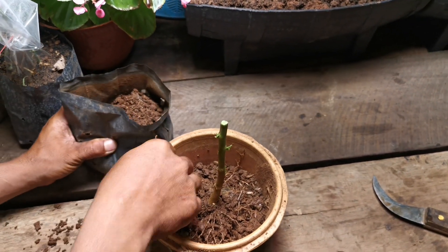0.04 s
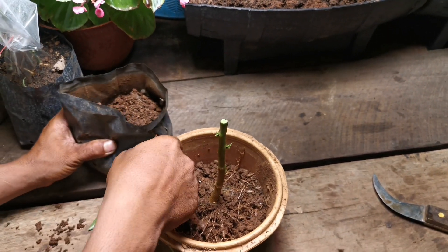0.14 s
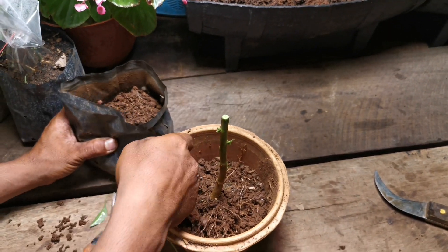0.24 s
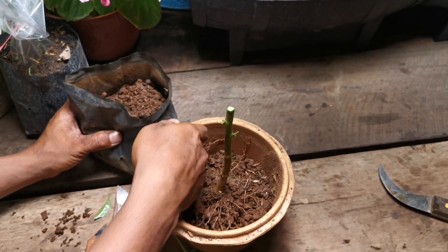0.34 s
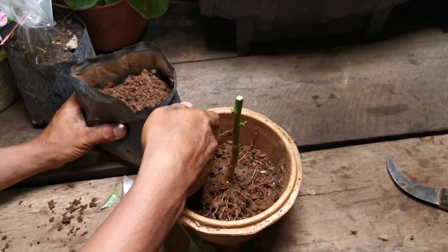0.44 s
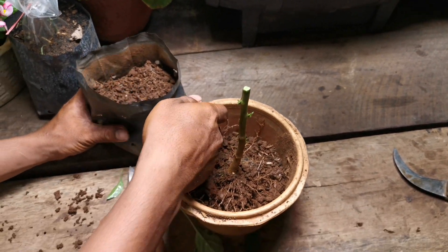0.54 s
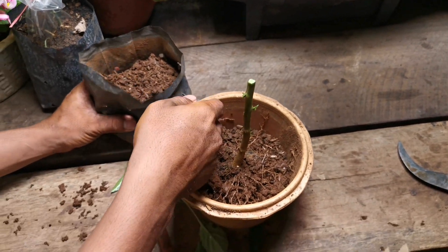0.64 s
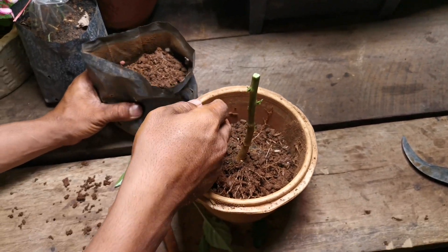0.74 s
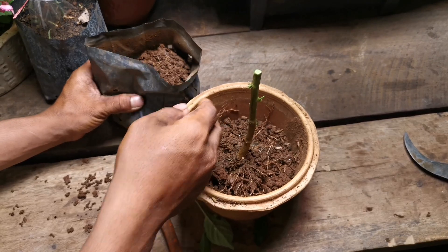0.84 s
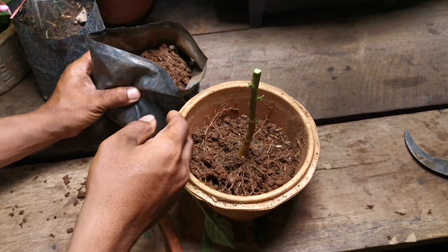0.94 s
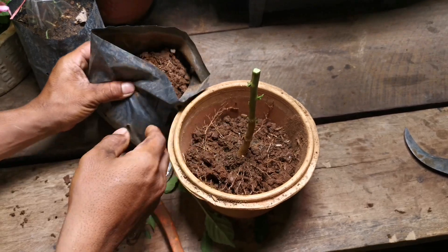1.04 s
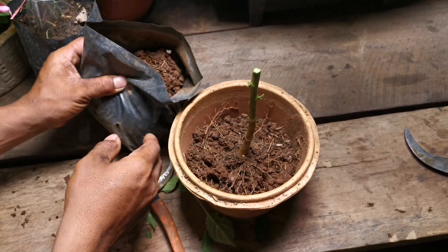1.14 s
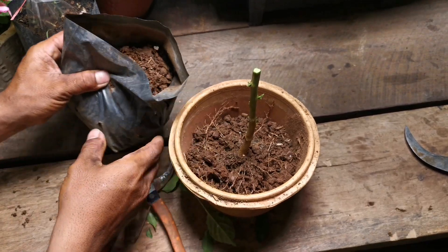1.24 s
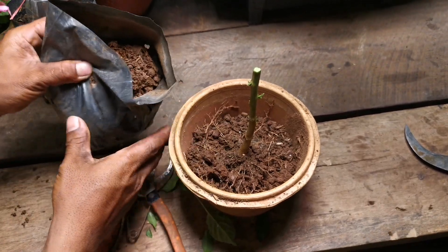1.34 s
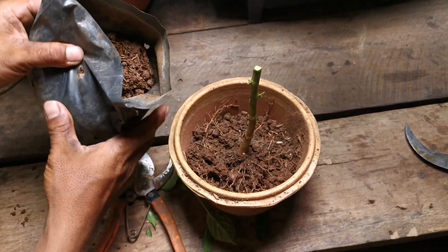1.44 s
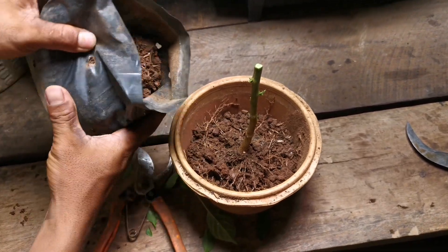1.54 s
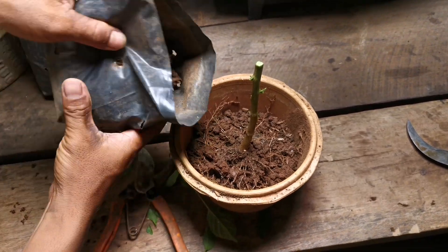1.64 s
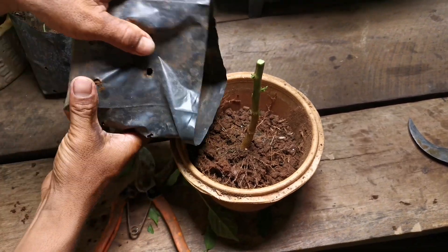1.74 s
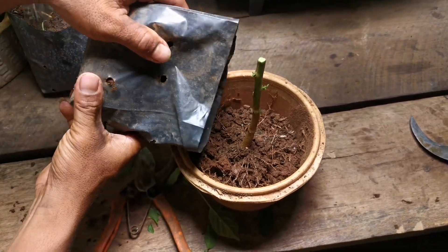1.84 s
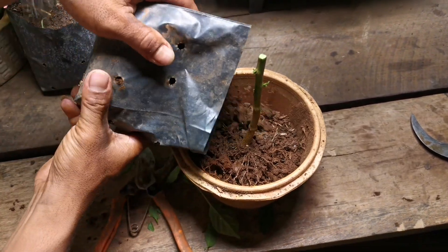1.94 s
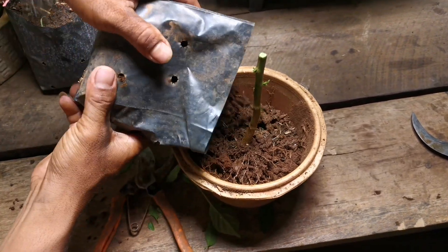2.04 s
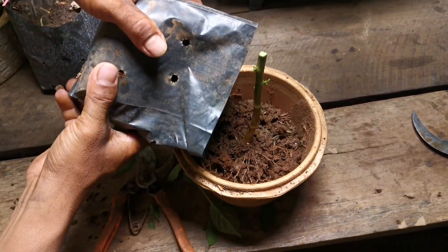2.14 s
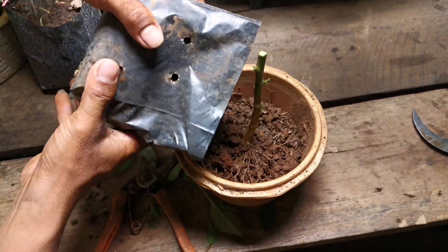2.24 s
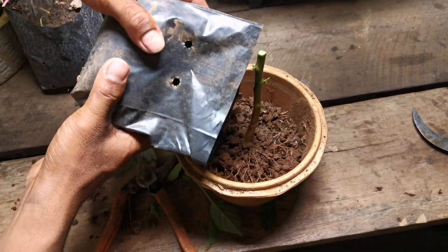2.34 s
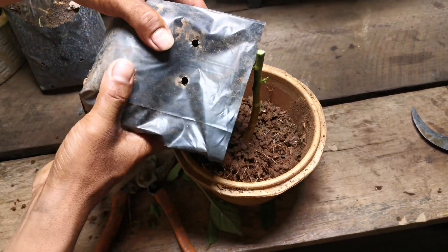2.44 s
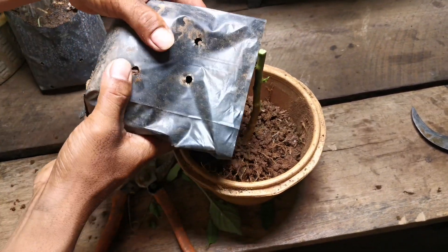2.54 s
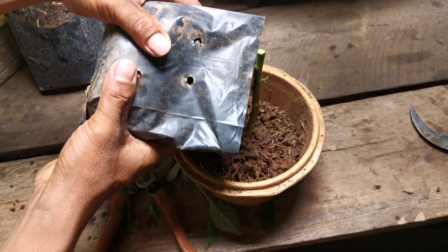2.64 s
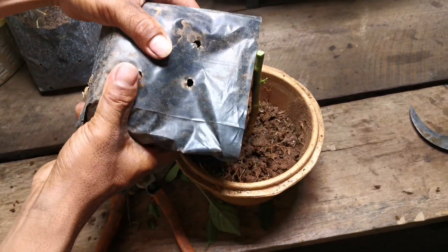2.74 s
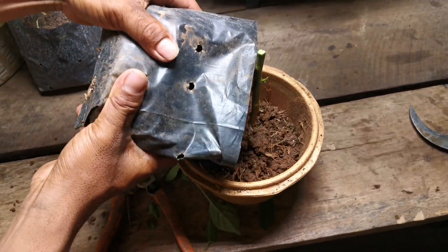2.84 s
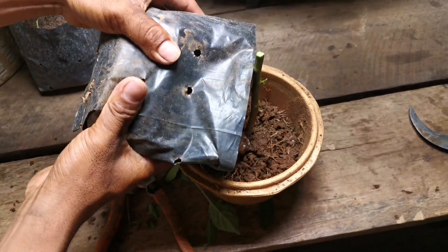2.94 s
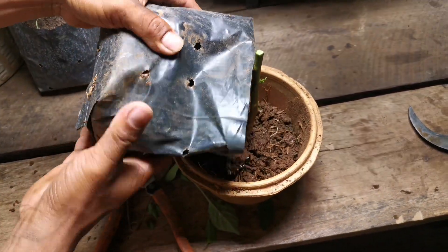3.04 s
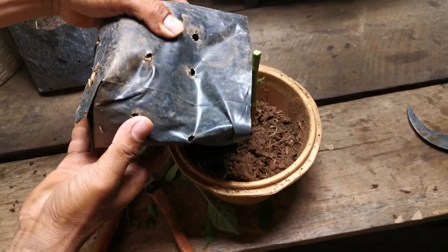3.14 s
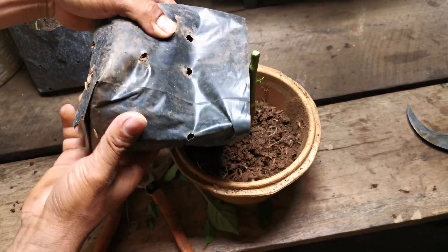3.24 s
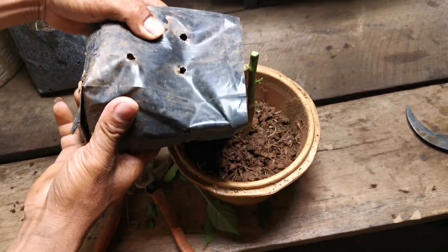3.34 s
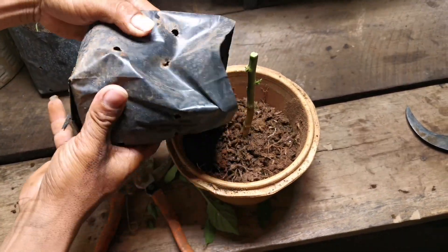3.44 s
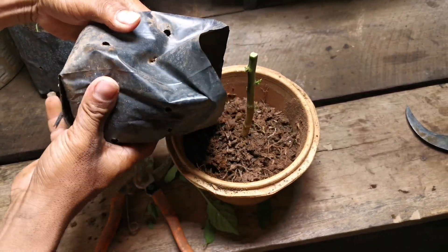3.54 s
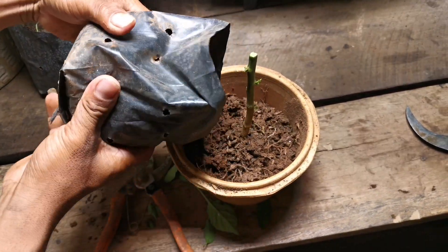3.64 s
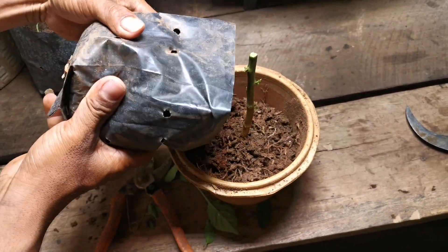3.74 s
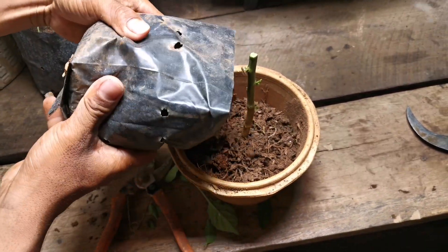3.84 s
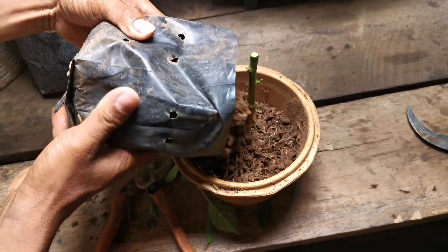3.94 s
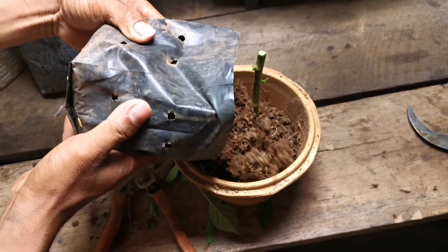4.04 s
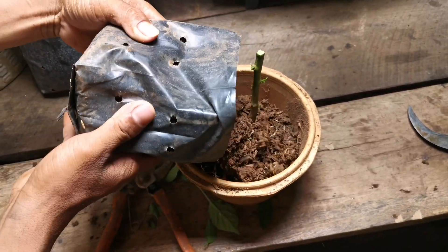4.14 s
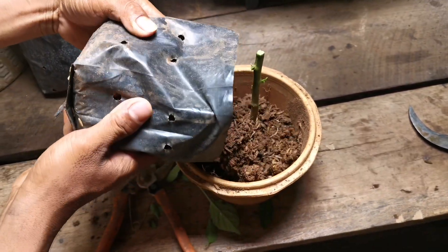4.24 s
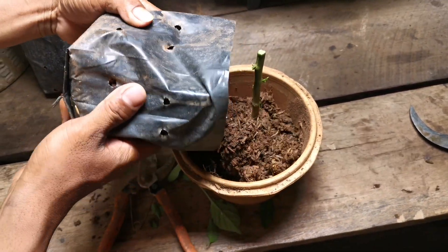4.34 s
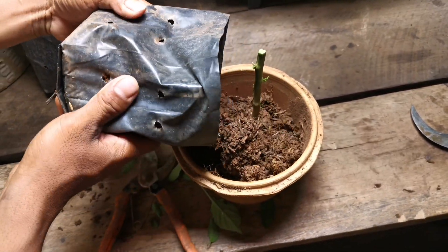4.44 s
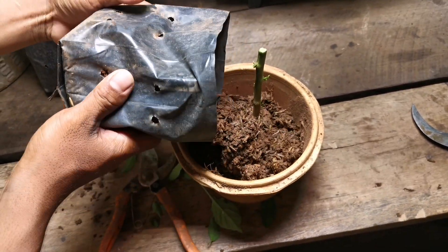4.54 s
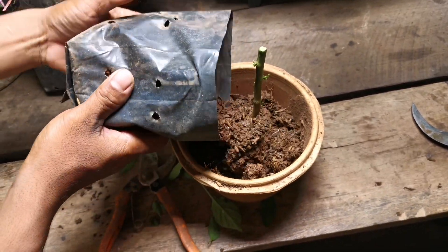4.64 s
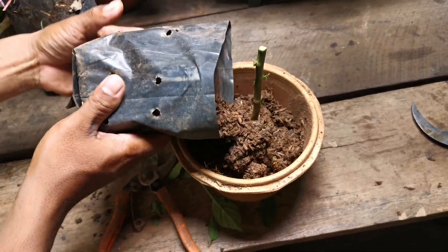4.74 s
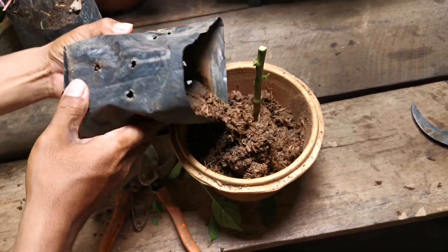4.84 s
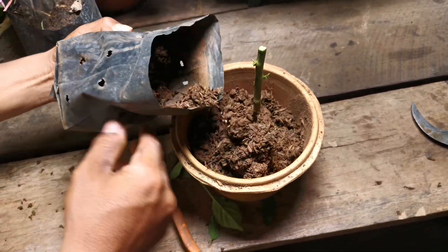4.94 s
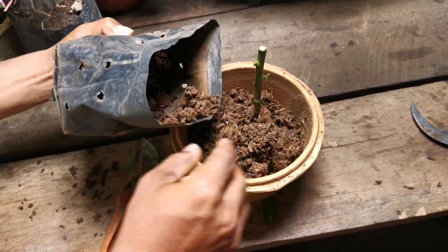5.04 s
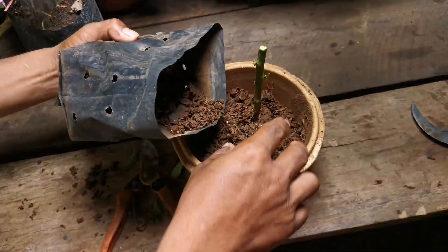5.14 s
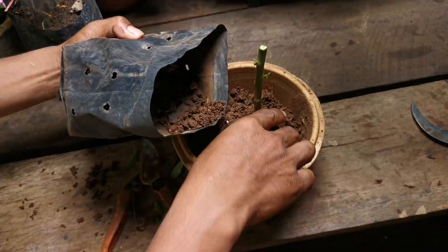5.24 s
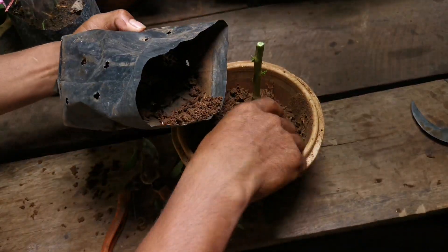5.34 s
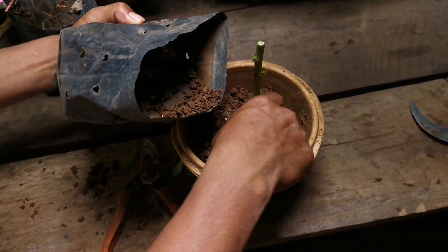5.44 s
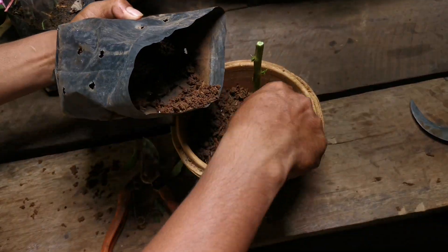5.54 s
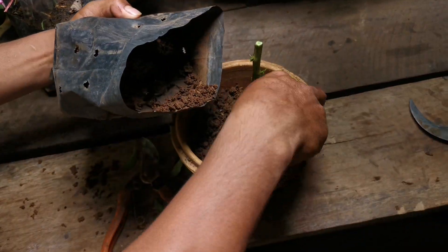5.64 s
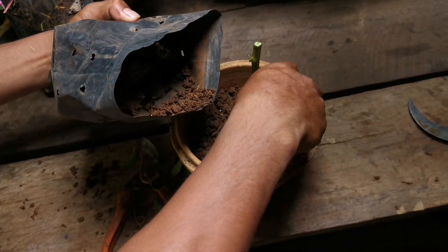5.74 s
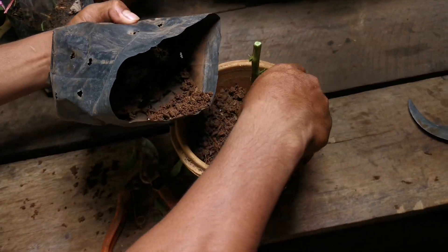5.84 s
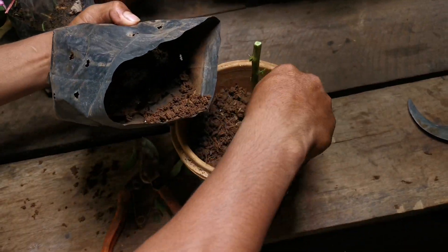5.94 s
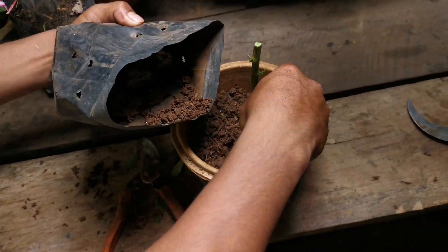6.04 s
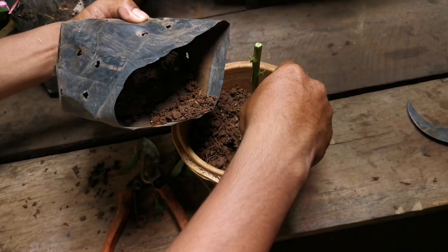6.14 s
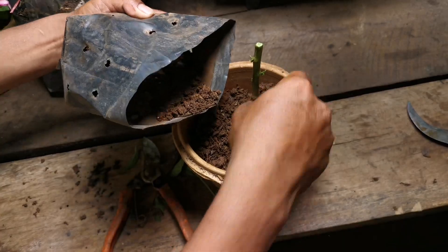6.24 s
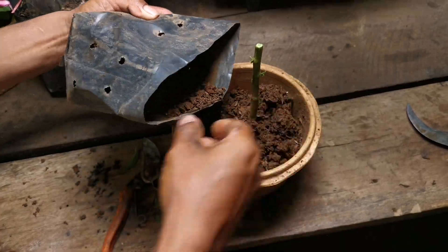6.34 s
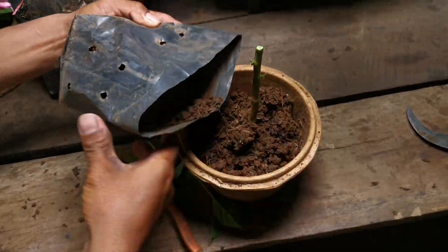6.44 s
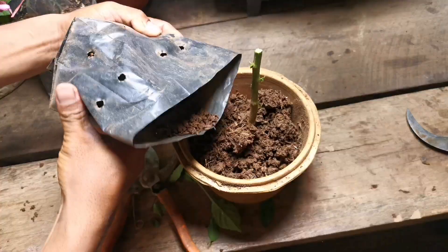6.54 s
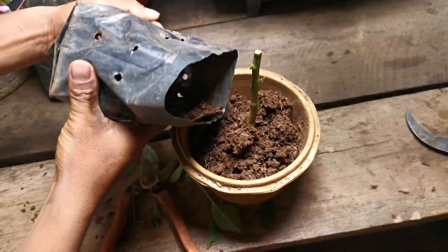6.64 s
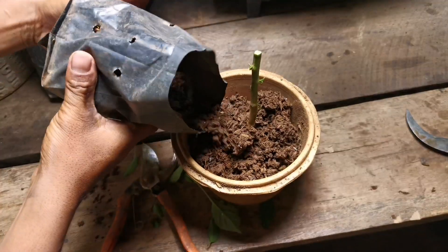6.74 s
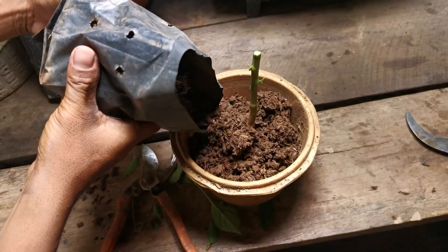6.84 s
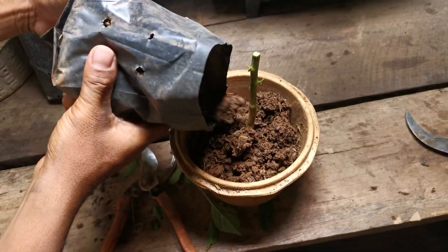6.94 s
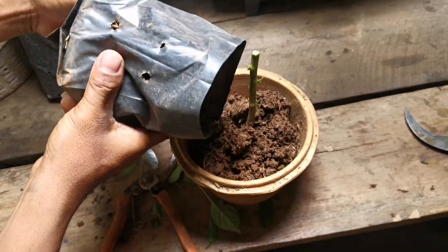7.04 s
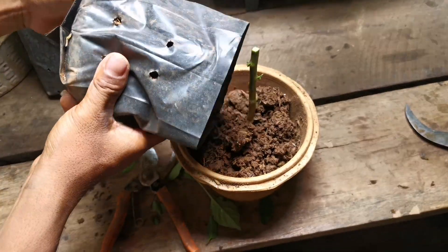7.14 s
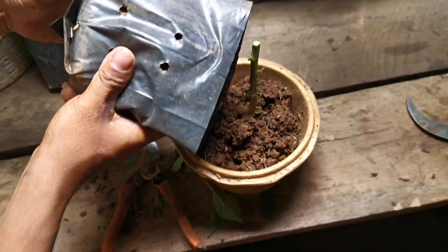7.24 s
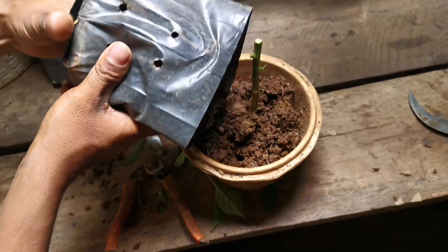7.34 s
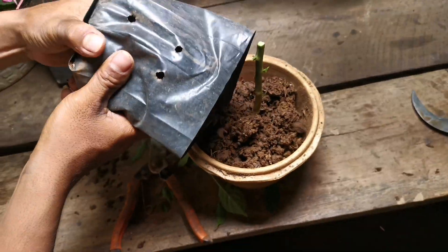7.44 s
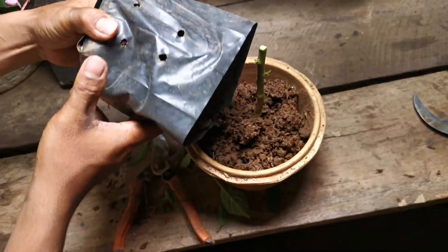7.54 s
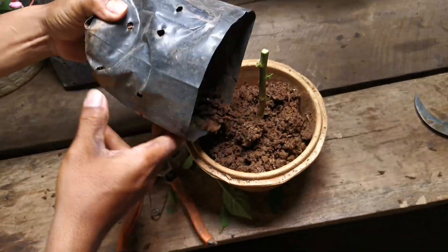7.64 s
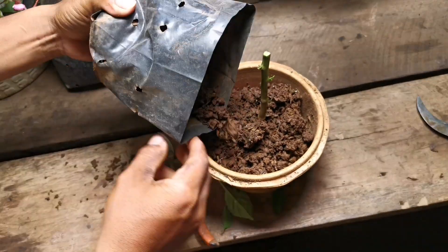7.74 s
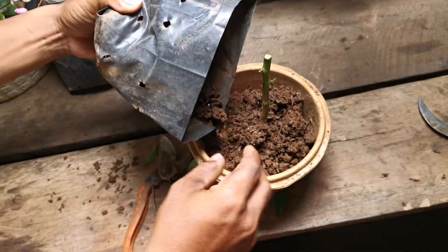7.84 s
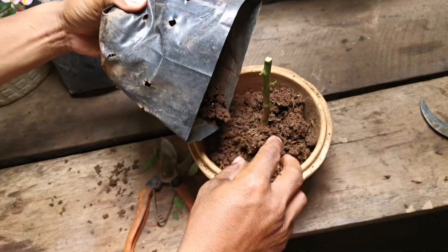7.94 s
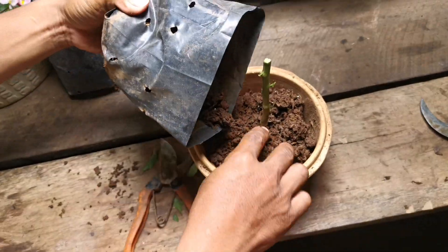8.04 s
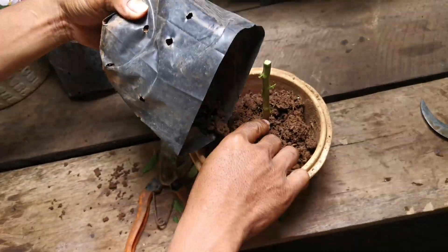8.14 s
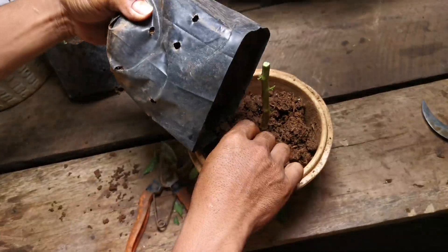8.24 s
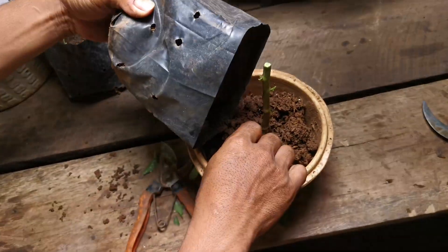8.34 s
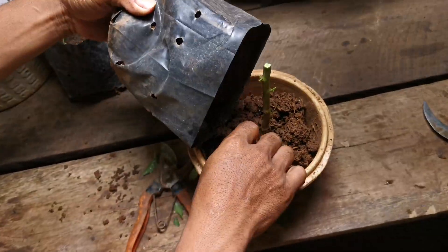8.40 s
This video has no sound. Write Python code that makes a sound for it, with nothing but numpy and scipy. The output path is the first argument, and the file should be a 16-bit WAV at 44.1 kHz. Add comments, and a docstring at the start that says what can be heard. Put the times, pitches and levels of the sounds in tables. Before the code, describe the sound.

A thin plastic bag crackles and snaps as dry potting soil slides into a clay pot, with insects singing around and a cricket chirping near.

```python
"""Insects sing on all sides of a plank porch; a far bird hoots at the start and once more at the end.
Dry potting soil then slides out of a thin plastic bag into a clay pot: clods, crumbs and dust are
clouds of small rings and hiss, and the bag snaps and crackles in the hands as folds buckle.
A near cricket chirps as the hands go quiet, then again as the pouring resumes. Only the right
microphone port is open: the blocked left one gives a dull noise hush with soft, damped bumps."""
import sys
import numpy as np
from scipy import signal
from scipy.fft import rfft, irfft, next_fast_len
from scipy.io import wavfile
from scipy.ndimage import map_coordinates

SR = 44100
rng = np.random.default_rng(int(sys.argv[2]) if len(sys.argv) > 2 else 0)


def volts_from_decibels(level):
    """Turn decibel levels (scalar or array-like) into linear amplitude factors."""
    exponent = np.asarray(level, float) / 20
    return 10 ** exponent


def file_out(sig):
    """Save sig as 16-bit WAV at sys.argv[1]."""
    # one column per channel
    cols = np.atleast_2d(sig).T
    # limit, then scale
    lim = np.clip(cols, -1, 1)
    pcm = np.round(lim * 32767).astype(np.int16)
    wavfile.write(sys.argv[1], SR, pcm)


N = 373527


def unit(x):
    """Scale to an rms of 1."""
    return x / np.sqrt(np.mean(x ** 2) + 1e-20)


def along(points, hz):
    """Read a curve of (hz, value) points on a log frequency axis."""
    f, v = np.transpose(points)
    return np.interp(np.log(hz + 1), np.log(f + 1), v)


def curves(rows):
    """One value per sample for each column after the time."""
    s, *cols = np.transpose(rows)
    return [np.interp(np.arange(N) / SR, s, c) for c in cols]


def wobble(rate):
    """A smooth random curve with rate knots a second, 190 at most."""
    knots = rng.standard_normal(int(N * 200 / SR))
    return map_coordinates(knots, [np.arange(N) * min(rate, 190) / SR])


def filtered(x, gain):
    """Multiply the spectrum of x by a gain that depends on frequency."""
    m = next_fast_len(N + 8192)
    return irfft(rfft(x, m) * gain(np.fft.rfftfreq(m, 1 / SR)), m)[:N]


def coloured(x, spectrum):
    """Shape x by a dB curve, then bring it to an rms of 1."""
    return unit(filtered(x, lambda hz: volts_from_decibels(along(spectrum, hz))))


def band(hz, width_hz):
    """Narrow noise of rms 1."""
    return unit(filtered(rng.standard_normal(N), lambda f: 1 / (1 + (2 * (f - hz) / width_hz) ** 4)))


def scatter(s, wave):
    """Add row k of wave at time s[k]."""
    at = np.round(s * SR).astype(int)[:, None] + np.arange(wave.shape[1])
    return np.bincount(at.ravel(), wave.ravel(), N + wave.shape[1])[:N]


def rings(s, db, hz, cycles, size=440):
    """One damped sine per row, dying by 60 dB in so many cycles."""
    t = np.arange(size) / SR
    decay = volts_from_decibels(db[:, None] - 60 * t * hz[:, None] / cycles)
    return scatter(s, decay * np.sin(2 * np.pi * hz[:, None] * t))


def cracks(s, db, t60, size=700):
    """One ragged, dying burst of noise per row."""
    t = np.arange(size) / SR
    envelope = volts_from_decibels(db[:, None] - 60 * t / t60) * (1 - np.exp(-t / 0.00012))
    return scatter(s, envelope * rng.standard_normal((len(s), size)))


def grains(hz, spread, cycles, scatter_db, hiss, count, size):
    """Countless small impacts of unequal size over a bed of hiss, clumping at random."""
    s = rng.random(count) * N / SR
    strength, pitch = rng.standard_normal((2, count))
    grain_hz = np.clip(hz * np.exp(spread * pitch), 100, 15000)
    hits = rings(s, scatter_db * np.minimum(strength, 2.6), grain_hz, cycles, size)
    return (unit(hits) + hiss * rng.standard_normal(N)) * volts_from_decibels(1.6 * wobble(22))


def by_chance(level_db, over_db, hz, spread, scatter_db, count):
    """Events at random moments, their strength following the movement then: (s, dB, Hz)."""
    s = rng.random(count) * (N / SR)
    size, pitch = rng.standard_normal((2, count))
    db = level_db[(s * SR).astype(int)] + over_db + scatter_db * size
    return s, db, hz * np.exp(spread * pitch)


def blocked_port():
    """Each push sucks the trapped air in fast; it swings back slowly, with a small ripple, over a hush."""
    # pushes on the blocked port: start_s, level_db, swing_hz
    pushes = [(0.943, -33, 45), (1.195, -42.5, 45.3), (2.84, -39, 108), (5.2, -41, 71.6),
              (6.493, -38.5, 41), (7.187, -41.5, 53.4), (8.009, -33, 46), (8.291, -41.5, 45)]
    # the port's own noise: frequency_hz, relative_level_db
    hush_colour = [(20, 7), (40, -3), (80, -9), (160, -8), (400, -13.5), (800, -19), (2000, -25),
                   (4000, -26), (7000, -42), (9000, -69), (15000, -73)]
    s, db, hz = np.transpose(pushes)
    t = np.arange(SR // 8) / SR
    turns = hz[:, None] * t
    swing = -np.sin(2 * np.pi * turns + 0.74) * volts_from_decibels(-60 * turns / 4.2) * (1 - np.exp(-(t / 0.0008) ** 2))
    ripple = -.25 * np.sin(2 * np.pi * 330 * t) * volts_from_decibels(-60 * t / 0.018) * (1 - np.exp(-t / 0.00081))
    bumps = scatter(s, volts_from_decibels(db[:, None]) * (swing + ripple))
    hush = volts_from_decibels(-72 + wobble(2.43)) * coloured(rng.standard_normal(N), hush_colour)
    return bumps + hush


def air():
    """Outdoor murmur: an unsteady low rumble of narrow noise over a steady, mostly low bed."""
    # slow course of the rumble: time_s, level_db
    rumble = [(0, -58.5), (.62, -65), (.9, -51), (1.2, -64), (2.1, -58.5), (3.2, -64.5), (4.3, -61.5),
              (4.8, -68), (6.2, -59), (6.9, -66), (8.47, -64)]
    # colour of the bed: frequency_hz, relative_level_db
    bed_colour = [(20, 2.5), (60, -24), (110, -2), (250, -13.5), (600, -20), (1500, -39), (2500, -40),
                  (4000, -97), (9000, -10.5), (16000, -32)]
    low = volts_from_decibels(curves(rumble)[0] + 4.7 * wobble(5.0)) * band(66.0, 51)
    return low + volts_from_decibels(-59.5) * coloured(rng.standard_normal(N), bed_colour)


def far_chorus():
    """Many far insects blend into sustained narrow bands of noise that flicker slightly."""
    # bands of the chorus: center_hz, width_hz, level_db
    chorus = [(2985, 240, -67), (4917, 700, -63.5), (6066, 830, -66), (6760, 210, -71.5),
              (7340, 620, -68.5)]
    return sum(volts_from_decibels(db + 0.46 * wobble(2.78) + 1.87 * wobble(40)) * band(hz, w) for hz, w, db in chorus)


def slow_buzzer():
    """A low insect buzzes in slow beats: flat-topped swells of rough narrow noise."""
    # beat of the buzzer: time_s, buzzes_so_far
    beat = [(.06, 0), (1.98, 6), (3.05, 9), (3.88, 11), (4.95, 14), (5.55, 15), (5.93, 16), (6.6, 18),
            (8.12, 23)]
    # loudness of the buzzer: time_s, level_db
    loudness = [(0, -63), (.6, -56.5), (1.1, -60.5), (2, -58.5), (4.2, -59), (4.9, -60.5), (6.3, -61),
                (7.2, -60), (7.7, -66), (8.12, -63)]
    beat_s, so_far = np.transpose(beat)
    centers_s = np.interp(np.arange(so_far[-1] + 1), so_far, beat_s)
    t = np.arange(N) / SR
    swell = sum(np.exp(-((t - s) / 0.09) ** 4) for s in centers_s)
    return volts_from_decibels(curves(loudness)[0]) * swell * volts_from_decibels(1.33 * wobble(70)) * band(3074, 430)


def fast_ticker():
    """A high insect ticks fast: narrow noise in short pulses, one for each count of its beat."""
    # beat of the ticker: time_s, pulses_so_far
    beat = [(.06, 0), (4.215, 40), (6.419, 61), (8.256, 79), (8.457, 81)]
    pulses = np.sin(np.pi * (curves(beat)[0] + .5)) ** 6
    return volts_from_decibels(-67) * pulses * band(7110, 260)


def bird():
    """Soft hoots: sines that waver a little in pitch, each with a catch midway."""
    # hoots: start_s, length_s, pitch_hz, level_db
    hoots = [(0.023, 0.13, 622, -60), (0.531, 0.17, 569, -53), (1.019, 0.21, 577, -55),
             (1.523, 0.19, 586, -55.5), (8.388, 0.11, 570, -58.5)]
    t = np.arange(N) / SR
    waver = wobble(38)  # radians of phase

    def shape(u):
        catch = 1 - 0.97 * np.exp(-((u - .48) / 0.073) ** 2)
        return np.sin(np.pi * np.clip(u, 0, 1)) * catch

    return sum(volts_from_decibels(db) * shape((t - s) / length) * np.sin(2 * np.pi * hz * t + waver)
               for s, length, hz, db in hoots)


def near_cricket():
    """Three strokes a chirp, each falling in pitch as the scraper catches tooth by tooth."""
    # phrases: first_chirp_s, gap_s, first_level_db, gain_per_chirp_db
    phrases = [(5.007, .2146, -53.5, 0.83), (6.339, .2553, -49, 0)]
    # chirps in each phrase: count
    chirp_counts = [6, 4]
    u = np.arange(SR // 30) / SR
    glide = 2 * np.pi * np.cumsum(5180 - 36000 * u) / SR
    teeth = 1 + 0.45 * np.sin(2 * np.pi * 195 * u)
    stroke = np.sin(np.pi * np.clip(u / 0.02, 0, 1)) ** 0.17 * teeth * np.sin(glide)
    starts = np.zeros(N)
    for (first_s, gap_s, first_db, gain_db), many in zip(phrases, chirp_counts):
        for n in range(many):
            for k, lift_db in enumerate([-1.5, .3, .3]):
                at = round((first_s + gap_s * n + .041 * k) * SR)
                starts[at] = volts_from_decibels(first_db + gain_db * n + lift_db + rng.normal(0, 1.0))
    return volts_from_decibels(2.9 * wobble(180)) * signal.fftconvolve(starts, stroke)[:N]


def hands():
    """Soil shifting in the bag and falling in the pot, in dB: every move rises, holds and settles."""
    # moves of the hands: start_s, length_s, shifting_in_bag_db, falling_or_pressed_in_pot_db
    moves = [(0.495, 0.95, -65.5, -73), (0.966, 0.34, -55, -67.5), (1.425, 0.31, -56.5, -65.5),
             (1.71, 0.16, -47.5, -78), (1.824, 0.3, -43.5, -49), (2.118, 0.25, -50, -53.5),
             (2.391, 0.33, -50.5, -62), (2.739, 0.58, -51, -55.5), (3.318, 0.12, -46.5, -48.5),
             (3.466, 0.44, -48.5, -50.5), (3.798, 0.35, -45, -50.5), (4.136, 0.21, -54, -56),
             (4.39, 0.25, -61.5, -66), (4.671, 0.044, -56, -75), (4.766, 0.24, -53.5, -59.5),
             (5.108, 0.19, -64, -69.5), (6.432, 0.1, -55, -59.5), (6.556, 0.29, -52, -55.5),
             (6.833, 0.37, -54, -58.5), (7.231, 0.19, -51, -55.5), (7.387, 0.3, -55.5, -61),
             (7.582, 0.18, -48.5, -55), (7.783, 0.27, -59, -61), (8.08, 0.066, -63, -73),
             (8.2, 0.19, -69, -65)]
    rise_s, settle_s = 0.022, 0.034
    rest_db = [[-74.5], [-73]]  # shifting and falling with the hands nearly still
    t = np.arange(N) / SR
    power = volts_from_decibels(rest_db) ** 2 * np.ones(N)
    for s, length, *db in moves:
        held = (1 + np.tanh((t - s) / rise_s)) * (1 - np.tanh((t - s - length) / settle_s)) / 4
        power = power + (volts_from_decibels(db)[:, None] * held) ** 2
    return 10 * np.log10(power)


def finger_scuffs():
    """Fingers brush soil and rim: short bands of noise, roughened as skin sticks and slips."""
    # scuffs: start_s, length_s, center_hz, width_hz, level_db
    scuffs = [(0.014, 0.029, 2240, 705, -55.5), (0.25, 0.04, 1870, 1510, -61),
              (0.567, 0.046, 1480, 1800, -62), (5.29, 0.065, 1870, 2130, -60.5),
              (5.665, 0.12, 2390, 850, -57), (6.008, 0.041, 1440, 900, -63),
              (6.037, 0.13, 1180, 1320, -67.5)]
    t = np.arange(N) / SR
    brushes = np.zeros(N)
    for s, length, hz, width_hz, db in scuffs:
        envelope = np.sin(np.pi * np.clip((t - s) / length, 0, 1) ** 0.44) ** 0.22
        brushes += volts_from_decibels(db) * envelope * band(hz, width_hz)
    return volts_from_decibels(2.5 * wobble(140)) * brushes


def clod_thuds(fall_db):
    """Big clods, and small ones by chance, land in the pot: two damped modes a blow."""
    # big clods landing: start_s, level_db, pitch_hz
    big = [(1.852, -38, 607), (1.869, -34, 710), (1.905, -34, 640), (1.952, -35, 710), (1.988, -36, 710),
           (3.259, -37.5, 520), (3.352, -38.5, 247), (3.444, -37.5, 280), (3.506, -31.5, 564),
           (3.754, -40, 166), (3.827, -37.5, 324), (3.924, -39, 440), (7.361, -34.5, 560)]
    small = by_chance(fall_db, -2.5, 430, spread=0.49, scatter_db=5.0, count=50)
    s, db, hz = np.hstack([np.transpose(big), small])
    low_mode = rings(s, db, hz, cycles=17.0, size=2000)
    high_mode = rings(s, db - 0.5, 1.45 * hz, cycles=7.2, size=1000)
    return low_mode + high_mode


def sliding_load(shift_db, fall_db):
    """Clods tumble, crumbs merge into a rush when hurried, film crackles and dust hisses, all in jerks."""
    # colours of the four grain clouds: frequency_hz, relative_level_db
    clod_colour = [(90, -10), (200, -4.5), (420, -1.5), (750, -1), (1100, -20), (2000, -56)]
    crumb_colour = [(500, -23), (950, -0.5), (1200, -9.5), (1900, -1.5), (2800, -4), (4000, -47),
                    (8000, -8.5)]
    film_colour = [(1800, 1.5), (3000, 0.5), (4000, 2.5), (5500, 3.5), (7000, 4.5), (9000, -12),
                   (12000, -29)]
    dust_colour = [(5000, -76), (8000, -4), (10000, 3), (13000, 4.5), (16000, 8.5)]
    # the bag sliding through fingers and over planks: middle_s, length_s, dust_level_db
    slides = [(1.06, 0.45, -38.5), (1.934, 0.43, -34), (2.235, 0.1, -33.5), (2.395, 0.09, -39.5),
              (3.082, 0.045, -34.5), (3.361, 0.069, -36), (4.048, 0.13, -34), (4.865, 0.34, -44.5),
              (6.631, 0.066, -34.5), (6.801, 0.11, -33), (7.257, 0.11, -34.5), (7.727, 0.14, -39)]
    over_brisk_db = shift_db + 50  # relative to a brisk shifting at -50 dB
    t = np.arange(N) / SR
    slide = sum(volts_from_decibels(db) * np.exp(-np.abs(2 * (t - s) / length) ** 3) for s, length, db in slides)
    jerks = volts_from_decibels(.5 * wobble(16) + 1.3 * wobble(90))  # the load slips and catches
    rush = 1.1 * volts_from_decibels(.6 * np.clip(over_brisk_db, 0, 9))
    clods = grains(520, spread=0.58, cycles=7.3, scatter_db=4.5, hiss=4.0, count=1000, size=600)
    crumbs = grains(1930, spread=0.481, cycles=8, scatter_db=4.2, hiss=rush, count=6000, size=200)
    film = grains(4030, spread=0.36, cycles=10.5, scatter_db=3.0, hiss=2.05, count=5000, size=150)
    dust = grains(8200, spread=0.11, cycles=7.1, scatter_db=1.5, hiss=1.54, count=5000, size=80)
    # film and dust grow about half as fast in dB as the shifting; slides add to both
    film_gain = np.hypot(volts_from_decibels(-56 + 0.56 * over_brisk_db), volts_from_decibels(-14) * slide)
    dust_gain = np.hypot(volts_from_decibels(-45 + 0.57 * over_brisk_db), slide)
    load = volts_from_decibels(fall_db) * coloured(clods, clod_colour)
    load += volts_from_decibels(shift_db) * coloured(crumbs, crumb_colour)
    load += film_gain * coloured(film, film_colour)
    load += dust_gain * coloured(dust, dust_colour)
    return jerks * load


def bag_snaps(shift_db):
    """Each buckling fold lets go at once, rings its panel, cracks, stirs two neighbours, spits an edge."""
    # loud folds of the film: start_s, level_db, main_ring_hz, edge_relative_db
    loud_folds = [(0.046, -42.5, 2500, 2.5), (0.6826, -31.5, 3100, -5.5), (0.782, -31, 2260, -5),
                  (0.836, -29.5, 1780, -2), (0.9024, -36, 1640, -22), (0.973, -33, 3980, -6),
                  (1.1913, -26.5, 1860, -33), (1.384, -54.5, 3870, 14), (1.4277, -28, 2320, -26),
                  (1.5749, -32.5, 1700, 1.5), (1.76, -27.5, 1430, -36), (1.846, -31, 890, -26),
                  (1.879, -36.5, 1970, 13), (1.972, -28.5, 1940, -21), (2.065, -23.5, 1730, -8),
                  (2.0841, -26.5, 1500, 2.5), (2.129, -34, 1620, -17), (2.149, -28.5, 2150, -3),
                  (2.361, -39.5, 2980, 8.5), (2.4529, -24, 2100, -12), (2.4638, -31, 2170, -11),
                  (2.583, -36.5, 3800, -13), (2.627, -27.5, 1480, -27), (2.665, -36.5, 1030, -15),
                  (2.694, -39, 1400, -15), (2.759, -28.5, 1930, -25), (2.7712, -32, 2190, -30),
                  (2.7742, -23, 2090, -35), (2.7782, -27.5, 1450, -30), (2.806, -36, 1880, -15),
                  (2.8658, -21.5, 2720, -3), (2.894, -33, 1500, -13), (2.9217, -24.5, 1960, -3.5),
                  (2.932, -36.5, 2100, 12.5), (2.952, -44, 2000, 8), (2.999, -18, 1590, -16),
                  (3.027, -31, 1590, -23), (3.046, -29, 824, -20), (3.065, -27, 1500, -12),
                  (3.106, -30.5, 1360, -17), (3.2187, -25.5, 1230, -7), (3.227, -31.5, 1970, -3),
                  (3.329, -40, 1590, -15), (3.356, -31.5, 2030, 1), (3.3663, -26.5, 1450, -5),
                  (3.402, -29, 2030, -2.5), (3.443, -51, 2570, -20), (3.467, -35.5, 2670, -15),
                  (3.5138, -30, 4000, -15), (3.5333, -27.5, 930, 0), (3.5487, -23.5, 2160, -26),
                  (3.575, -31, 2540, -20), (3.587, -27.5, 2070, -11), (3.62, -27.5, 1320, -30),
                  (3.627, -32, 1500, -10), (3.658, -29, 2550, -13), (3.664, -26.5, 1590, 1),
                  (3.689, -27.5, 1330, 2.5), (3.705, -37, 1230, -15), (3.733, -34, 2150, -5),
                  (3.804, -30, 1960, -17), (3.832, -29, 1010, -5.5), (3.862, -23.5, 2070, -29),
                  (3.8702, -23.5, 2160, -10), (3.956, -29, 1800, -15), (3.9686, -29.5, 2420, -25),
                  (3.9976, -20.5, 2130, -2), (4.035, -33, 2530, -19), (4.064, -30.5, 1880, -10),
                  (4.2336, -28.5, 1560, 3), (4.2482, -34, 1450, -5), (4.271, -35, 1390, -3),
                  (4.352, -44, 1510, -23), (4.411, -39, 1800, -18), (4.448, -42, 2210, -15),
                  (4.458, -46, 1460, 3), (4.705, -43, 990, -10), (4.765, -34.5, 2500, -8),
                  (4.795, -35.5, 2480, 7), (4.798, -35.5, 1620, -4), (4.832, -25.5, 1510, -4),
                  (4.946, -32, 900, -19), (5.126, -47, 1800, -20), (5.152, -46, 4030, -25),
                  (5.172, -48, 900, -25), (5.193, -49, 2200, -5), (5.244, -46, 2980, 3),
                  (5.296, -47.5, 1060, -12), (6.306, -47, 1770, -16), (6.33, -39, 2130, -4),
                  (6.3508, -36.5, 1850, -15), (6.4765, -28, 1250, 0.5), (6.502, -34, 1250, -6),
                  (6.5782, -34.5, 2170, -4), (6.612, -35, 1500, -2), (6.636, -32.5, 1600, 0.5),
                  (6.646, -33, 1150, 3), (6.683, -44, 2140, -15), (6.707, -37, 1990, -8),
                  (6.724, -42, 1490, -13), (6.9423, -22.5, 1425, -2.5), (7.034, -36.5, 2840, 2.5),
                  (7.074, -41, 2540, 2), (7.151, -42, 3160, -12), (7.189, -40, 2940, -12),
                  (7.229, -35.5, 1220, 7.5), (7.25, -37.5, 3470, 6), (7.284, -51, 1600, -20),
                  (7.293, -27, 2800, -10), (7.297, -23.5, 1380, -12), (7.318, -35, 2880, -22),
                  (7.3366, -27.5, 2570, -3), (7.365, -37, 1980, -18), (7.3758, -31, 910, 0),
                  (7.4416, -29, 3200, -6), (7.507, -40.5, 925, -15), (7.556, -33.5, 4400, 1),
                  (7.609, -27, 1090, 3), (7.6367, -23.5, 1240, -11), (7.648, -50, 3900, 10),
                  (7.678, -29, 2080, -20), (7.687, -33, 2500, -13), (7.7729, -22, 1890, -6),
                  (7.8707, -25, 2060, -3.5), (7.945, -32.5, 920, -20), (7.971, -43, 1480, 5),
                  (7.978, -33.5, 2200, -20), (8.266, -45, 900, -20), (8.421, -42, 2080, -2)]
    small = by_chance(shift_db, 9.5, 2250, spread=0.38, scatter_db=3.5, count=140)
    small_edge_db = rng.normal(-12, 5, len(small[0]))
    s, db, hz, edge_db = np.hstack([np.transpose(loud_folds), [*small, small_edge_db]])
    t = np.arange(440) / SR
    # the crease lets go; the panel is still in a few milliseconds
    release = (1 - np.exp(-t / 0.00012)) * np.exp(-t / 0.0009)
    main = scatter(s, -volts_from_decibels(db[:, None] + 4.0) * release * np.sin(2 * np.pi * hz[:, None] * t))
    neighbours = np.zeros(N)
    for ratio in [.7, 1.5]:
        strength, pitch = rng.standard_normal((2, len(s)))
        neighbours += rings(s, db - 10.0 + 2 * strength, hz * ratio * np.exp(0.23 * pitch), cycles=23)
    crack = filtered(cracks(s, db + 1.5, t60=0.019),
                     lambda f: 1 / (1 + (700 / (f + 1)) ** 3 + (f / 4200) ** 4))
    edge = filtered(cracks(s, db + edge_db + 11.5, t60=0.005),
                    lambda f: 1 / (1 + (5200 / (f + 1)) ** 6 + (f / 15000) ** 2))
    return main + neighbours + crack + edge


def porch(x):
    """Planks and walls answer with a decaying noise tail, drawn anew every third of a second."""
    # decay of the porch: frequency_hz, t60_s
    decay = [(300, 0.06), (2000, 0.12), (8000, 0.2)]
    out, step = np.zeros(N + SR), SR // 3
    for start in range(0, N, step):
        hz, t, z = signal.stft(rng.standard_normal(SR // 4), SR, nperseg=256)
        dying = z * volts_from_decibels(-60 * t / along(decay, hz)[:, None])
        tail = signal.istft(dying, SR, nperseg=256)[1]
        wet = signal.fftconvolve(x[start:start + step], tail / np.linalg.norm(tail))
        out[start + 60:][:len(wet)] += wet  # 60 samples of delay
    return out[:N]


def scene():
    """Left: the blocked port. Right: bag, soil and cricket up close, with insects, bird and air behind."""
    far = far_chorus() + slow_buzzer() + fast_ticker() + bird() + air()
    cricket = near_cricket()
    shift_db, fall_db = hands()
    soil = sliding_load(shift_db, fall_db) + clod_thuds(fall_db) + finger_scuffs()
    folds = bag_snaps(shift_db)
    echo = porch(volts_from_decibels(-8.0) * folds + volts_from_decibels(-4.5) * cricket)
    return np.array([blocked_port(), folds + soil + cricket + echo + far])


def low_pass(x):
    """Removes everything above the highest recorded frequency."""
    return signal.sosfilt(signal.butter(12, 16400, fs=SR, output="sos"), x)


def record(dry):
    """The open port lifts the tone around 7 kHz and loses the top treble."""
    # response of the open port: frequency_hz, gain_db
    response = [(20, -4), (7000, 7), (8300, -10), (10500, -20), (15300, -27), (15700, -61), (18000, -62)]
    open_port = filtered(dry[1], lambda hz: volts_from_decibels(along(response, hz)))
    mix = np.array([dry[0], open_port])
    return low_pass(mix)


dry = scene()
out = record(dry)
file_out(out)
```